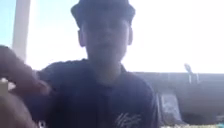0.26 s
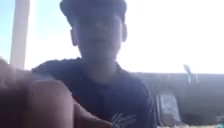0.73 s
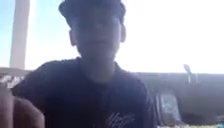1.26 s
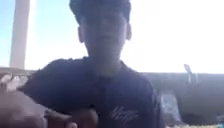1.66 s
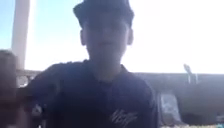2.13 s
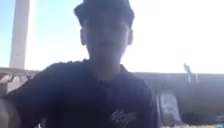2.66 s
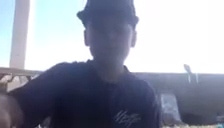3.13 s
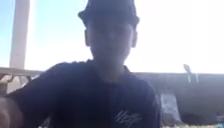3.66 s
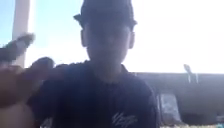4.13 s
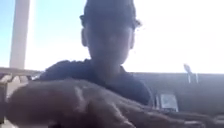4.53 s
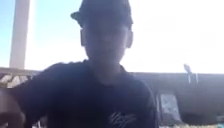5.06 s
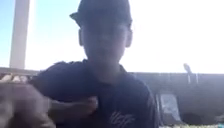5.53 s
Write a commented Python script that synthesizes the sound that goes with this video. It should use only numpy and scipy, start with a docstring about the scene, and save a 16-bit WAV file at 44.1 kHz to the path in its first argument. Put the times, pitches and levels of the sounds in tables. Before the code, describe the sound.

A toy fingerboard clatters onto a hollow plastic cooler lid right at the start, close by, with a faint low outdoor rumble behind. A sharp pop comes at about 0.5 seconds, followed by a short whirring roll over the pebbled plastic. From 1.3 seconds the board skids and clacks hard, and at 1.5 a hand jolts the cooler with one deep, short thud. Gritty scrapes, rolling and more clatter follow until about 2.5 seconds. Then it is quieter, with fingers shuffling the board and tapping it down lightly. Around 3.9 to 4.1 seconds loud clacks and skids drum the lid. The wheels roll with a hollow rumble from 4.2 to about 4.9 seconds, with one clack along the way. A last cluster of hard hits and scrapes comes at 5.3 to 5.5 seconds, ending in a brief roll and a soft tap near 5.8.

```python
"""A toy fingerboard is ridden on the hollow plastic lid of a cooler, outdoors and close by.
Its tail pops on the lid and its wheels clatter down: each hit rings the board and drums the lid.
Rolling and skidding over the pebbled plastic make tiny bumps that whirr, hiss and rumble.
Fingers shuffle the board back and tap it down, and the hand jolts the cooler once.
A faint low rumble lies behind."""
import sys
import numpy as np
from scipy import signal
from scipy.fft import rfft, irfft, next_fast_len
from scipy.io import wavfile
from scipy.ndimage import map_coordinates

SR = 44100
rng = np.random.default_rng(int(sys.argv[2]) if len(sys.argv) > 2 else 0)


def digitize_waveform(pressure):
    """Quantize a signal to 16-bit integers and store it at the path in sys.argv[1].

    Rows of a 2-D input are taken as channels; values are limited to [-1, 1].
    """
    field = np.atleast_2d(pressure).T
    bounded = np.clip(field, -1, 1)
    quanta = np.round(bounded * 32767).astype(np.int16)
    wavfile.write(sys.argv[1], SR, quanta)


N = 255735


def amp(db):
    """Turn decibels into a number to multiply by."""
    return 10 ** (np.asarray(db) / 20)


def unit(x):
    """Scale a sound to an average (rms) level of 1."""
    return x / np.sqrt(np.mean(x ** 2) + 1e-20)


def wobble(rate):
    """A smooth random curve through `rate` points a second."""
    return map_coordinates(rng.standard_normal(int(N * rate / SR) + 4), [np.arange(N) * rate / SR])


def coloured(x, tone):
    """Filter a sound to follow a tone curve of (pitch_hz, level_db) points."""
    size = 8192
    pitch_hz, level_db = np.transpose(tone)
    curve_db = np.interp(np.log(np.fft.rfftfreq(size, 1 / SR) + 1), np.log(pitch_hz), level_db)
    # build the filter so that it never sounds ahead of its input
    cepstrum = irfft(np.log(amp(curve_db)))
    cepstrum[1:size // 2] *= 2
    cepstrum[size // 2 + 1:] = 0
    response = irfft(np.exp(rfft(cepstrum))).reshape((1,) * (x.ndim - 1) + (-1,))
    return signal.fftconvolve(x, response, axes=-1)[..., :x.shape[-1]]


def lowpass(x, top_hz):
    """Cut away the sound above top_hz."""
    size = next_fast_len(N + SR // 2)
    hz = np.fft.rfftfreq(size, 1 / SR)
    return irfft(rfft(x, size) / np.sqrt(1 + (hz / top_hz) ** 120), size)[..., :N]


def brighter(x, level_db, edge_hz=7000, neutral_db=-32):
    """Hard contact gets more treble, soft contact less."""
    treble = signal.sosfiltfilt(signal.butter(2, edge_hz, "highpass", fs=SR, output="sos"), x)
    return x + (amp(0.3549 * (level_db - neutral_db)) - 1) * treble


def wander(x, depth_db, width_hz, life_s):
    """Random pitch bands swell and sink, as they do when the board moves from spot to spot."""
    hz, t, bands = signal.stft(x, SR, nperseg=512)
    grid = np.array(np.meshgrid(hz / width_hz, t / life_s, indexing="ij"))
    drift = map_coordinates(rng.standard_normal((512, 256)), grid, order=1, mode="wrap")
    drift *= np.clip(hz / 1500, .7, 1.4)[:, None]  # high pitches change most
    return signal.istft(bands * amp(depth_db * drift), SR, nperseg=512)[1][:N]


def fade(t, fade_s):
    """Die away by 60 dB in fade_s seconds."""
    return np.exp(-np.log(1000) * t / fade_s)


def struck(rows):
    """Scale each hit so that its first 6 ms have an average level of 1."""
    head = int(.006 * SR)
    return rows / np.sqrt(np.mean(rows[:, :head] ** 2, axis=1, keepdims=True))


def ring(tones, t, boost_db, scatter_db, detune):
    """A struck part rings with fading tones, a little different each time; one row per hit."""
    out = 0
    for k, (hz, db, fade_s) in enumerate(tones):
        level_db = db + boost_db(hz)
        level_luck, pitch_luck = rng.standard_normal((len(level_db), 2)).T[:, :, None]
        wave = np.sin(2 * np.pi * hz * (1 + detune * pitch_luck) * t)
        out = out + (-1) ** k * amp(level_db + scatter_db * level_luck) * fade(t, fade_s) * wave
    return struck(out)


def burst(tone, t, count, crack_s, tail_db, tail_s):
    """A noisy crack, then the rattle of small parts; one row per hit."""
    shape = fade(t, crack_s) + amp(tail_db) * fade(t, tail_s)
    return struck(coloured(rng.standard_normal((count, len(t))) * shape, tone))


# Tone of the outdoor background: pitch_hz, level_db
OUTDOOR_TONE = [(25, -38), (52, -8), (78, -1), (140, -12.5), (330, -19.5), (700, -31.5), (2000, -53.5),
                (10000, -69.5)]
def outdoors():
    """A low, slightly restless rumble."""
    return amp(-44.0 + 0.23 * wobble(1.4)) * unit(coloured(rng.standard_normal(N), OUTDOOR_TONE))


def cooler_jolt(start_s=1.502, pitch_hz=55.0):
    """The hand jolts the cooler, which rocks with a deep, short thud."""
    t = np.maximum(np.arange(N) / SR - start_s, 0)
    return amp(-19) * fade(t, 0.3) * (1 - fade(t, .04)) * np.sin(2 * np.pi * pitch_hz * t)


# The wheels speed up and run out (grit and rumble are counted from level_db):
# fastest_s, speed_up_s, run_out_s, level_db, grit_db, rumble_db
RIDES = [(0.06, 0.033, 0.19, -26, -7.5, -20), (0.56, 0.065, 0.21, -20, -9, -11),
         (0.677, 0.094, 0.14, -15.5, -8.5, -1), (1.99, 0.2, 0.29, -26.5, -12.5, -14.5),
         (2.229, .14, 0.17, -27.5, -11.5, -1), (4.21, 0.15, 0.18, -30.5, -9.5, -3),
         (4.502, .12, 0.19, -24.5, -9.5, 1.5), (4.698, 0.17, 0.26, -21, -8.5, 1),
         (5.488, 0.11, .15, -27.5, -12.5, 0.5)]
# The board skids or is shuffled sideways (grit is counted from level_db):
# strongest_s, length_s, level_db, grit_db
SKIDS = [(0.4, 0.49, -56.5, -1.5), (0.459, 0.027, -29, -1), (0.897, 0.14, -36.5, -8.5),
         (1.094, 0.18, -46, -10), (1.299, 0.11, -20.5, -5), (1.505, 0.14, -21.5, -4),
         (1.677, 0.14, -51, 3.5), (1.745, 0.088, -21, -7), (1.824, 0.067, -29.5, -5),
         (1.885, 0.055, -22, -6), (2.307, 0.09, -28.5, -3.5), (2.427, 0.079, -30.5, -9),
         (2.558, 0.18, -32, -14.5), (2.753, 0.11, -30, -20.5), (3.163, 0.072, -40, -15),
         (3.288, 0.27, -48, -16), (3.871, 0.038, -31, -18), (3.939, 0.1, -23, -8.5),
         (4.104, 0.11, -18.5, -8), (5.292, 0.11, -23.5, -6), (5.422, 0.098, -18.5, -3),
         (5.627, 0.05, -39.5, -3.5), (5.762, 0.17, -35, -17.5)]
def board_travel():
    """How loud wheels, grit and lid rumble are: each ride or skid swells with speed and dies away."""
    t = np.arange(N) / SR
    ride_curves, skid_curves = (2.8, 1.79), (1.29, 1.29)  # rise, fall; smaller makes a sharper peak
    skid_rise_share, skid_rumble_db, drop_db = .42, -2.5, 22
    moves = [(*ride, *ride_curves) for ride in RIDES]
    for peak_s, length_s, db, grit_db in SKIDS:
        rise_s, fall_s = skid_rise_share * length_s, (1 - skid_rise_share) * length_s
        moves.append((peak_s, rise_s, fall_s, db, grit_db, skid_rumble_db, *skid_curves))
    # the hand never holds the board quite still
    energy = np.zeros((3, N)) + amp([[-65.5], [-75], [-65.5]]) ** 2
    for peak_s, rise_s, fall_s, db, grit_db, rumble_db, rise_curve, fall_curve in moves:
        near = slice(*np.searchsorted(t, [peak_s - 3 * rise_s, peak_s + 3 * fall_s]))
        since = t[near] - peak_s
        slowing = np.where(since < 0, abs(since / rise_s) ** rise_curve, abs(since / fall_s) ** fall_curve)
        peak_db = np.array([[db], [db + grit_db], [db + rumble_db]])
        energy[:, near] += amp(peak_db - drop_db * slowing) ** 2
    return np.sqrt(energy)


def pebble_bumps(per_second, spread_db, rub_db):
    """Tiny random bumps on the pebbled plastic, over a smooth rub."""
    hit = rng.random(N) < per_second / SR
    size = amp(spread_db * np.clip(rng.standard_normal(N), -2, 2)) * rng.choice([-1, 1], N)
    return unit(hit * size) + amp(rub_db) * rng.standard_normal(N)


# Ringing tones of the lid's panels, also used for hits: pitch_hz, level_db, fade_s
PANEL_RING = [(270, -9.5, 0.27), (334, -0.5, 0.077), (430, -4, 0.04), (567, 1.5, 0.022), (753, -4, 0.12),
              (939, 7, 0.036), (1065, 2.5, 0.046), (1245, -1.5, 0.046), (1475, 5, 0.044),
              (1626, -9.5, 0.044), (1660, -9.5, 0.048)]
# Tone of the whirring wheels: pitch_hz, level_db
WHEEL_TONE = [(250, -30.5), (550, -4.5), (800, -2), (960, 4), (1120, -3), (1300, -3), (1550, -8),
              (1850, -16), (3000, -56.5)]
# Tone of the gritty hiss, also used for hits: pitch_hz, level_db
GRIT_TONE = [(1100, -26.5), (1900, 6), (2800, 9), (4400, -0.5), (6000, 0), (7600, 0), (8400, -4.5),
             (9500, -8.5)]
# Tone of the hollow lid's rumble: pitch_hz, level_db
HOLLOW_TONE = [(70, -41), (125, -2.5), (185, 8.5), (235, 1.5), (288, 10.5), (345, 5.5), (450, 5.5),
               (660, 6.5), (980, -24.5)]
def rolling_wheels():
    """The same bumps sound in the wheels, ring the panels, hiss as grit and rumble in the lid."""
    wheel_gain, grit_gain, rumble_gain = board_travel()
    bumps = pebble_bumps(per_second=1300, spread_db=3.0, rub_db=-1.0)
    bumps *= amp(1.97 * wobble(120))  # uneven wheels chatter
    bumps = wander(bumps, depth_db=4.2, width_hz=110, life_s=.13)
    t = np.arange(SR // 5) / SR
    treble_boost_db = lambda hz: np.array([[3 * np.log2(hz / 1000)]])
    one_ring = ring(PANEL_RING, t, treble_boost_db, scatter_db=9.0, detune=0.0022)[0]
    panels = unit(signal.fftconvolve(bumps, one_ring)[:N])
    wheels = unit(unit(coloured(bumps, WHEEL_TONE)) + amp(-13.5) * panels)
    grit = brighter(unit(coloured(bumps, GRIT_TONE)), 20 * np.log10(grit_gain))
    rumble = unit(coloured(bumps, HOLLOW_TONE))
    return amp(-2.5) * (wheel_gain * wheels + rumble_gain * rumble) + amp(-2.73) * grit_gain * grit


# The board hits the lid: start_s, clack_db, snap_db, drum_db
BOARD_HITS = [(0.006, -19.5, -28, -33), (0.031, -22, -30, -54), (0.050, -14.5, -19.5, -26.5),
              (0.084, -23.5, -27, -38), (0.112, -16, -22, -37), (0.125, -15.5, -24, -51),
              (0.166, -24, -41, -56), (0.218, -34, -56, -75), (0.4673, -10, -19, -39),
              (0.66, -14.5, -37, -42), (0.689, -19, -37, -45), (1.291, -18.5, -20, -20.5),
              (1.3931, -14.5, -23.5, -30), (1.4103, -7.5, -19, -28), (1.461, -19, -26, -37),
              (1.4977, -12, -17.5, -20), (2.046, -21, -55, -44), (2.102, -18, -30, -36),
              (2.121, -15.5, -21, -28), (2.154, -15.5, -20.5, -29), (2.196, -40, -25, -39),
              (2.289, -20, -34, -35.5), (2.382, -28.5, -37.5, -46), (3.086, -27, -46, -38),
              (3.937, -13, -19, -16.5), (4.074, -9, -20, -16), (4.087, -8, -19.5, -20.5),
              (4.112, -15, -47, -45), (4.653, -12.5, -34, -32), (4.976, -25.5, -26.5, -27),
              (5.284, -22.5, -22, -17), (5.39, -7, -23.5, -16.5), (5.402, -7.5, -28, -34),
              (5.493, -21, -39, -52), (5.765, -29, -50, -51)]
# Fingertips set the board down lightly: start_s, clack_db
LIGHT_TAPS = [(0.897, -33), (0.996, -44), (1.015, -47.5), (1.074, -40.5), (1.121, -36.5), (1.248, -33),
              (2.223, -26.5), (2.827, -42), (2.896, -48), (2.971, -48), (3.063, -44.5), (3.371, -47),
              (3.5, -51.5), (3.751, -53.5), (5.036, -32.5), (5.179, -34.5), (5.264, -28.5)]
def axle_hits_and_taps():
    """List both axles of every hit, then the taps, in the same columns as BOARD_HITS."""
    start_s, clack_db, snap_db, drum_db = np.transpose(BOARD_HITS)
    loss_db = -1 + 1.18 * clack_db  # a harder hit leaves more for the second axle
    lag_s = .008 * np.exp(.2 * rng.standard_normal(len(start_s)))  # the board's tilt varies
    # the lid drums mostly when the second axle brings the weight down
    first = np.column_stack([start_s, clack_db, snap_db, drum_db - 9.5])
    second = np.column_stack([start_s + lag_s, clack_db + loss_db, snap_db + loss_db, drum_db])
    taps = [(tap_s, db, db - 10.5, db - 4.5) for tap_s, db in LIGHT_TAPS]
    return np.vstack([first, second, taps])


# Where the board lands decides which pitch rings most: time_s, pitch_hz
LANDING_SPOTS = [(0.47, 574), (1.28, 1450), (1.52, 1545), (2.1, 1076), (2.3, 270), (3.94, 860), (4.07, 370),
                 (4.65, 405), (5.39, 1070), (5.45, 430)]
# Tone of the noisy knock in each clack: pitch_hz, level_db
KNOCK_TONE = [(60, -13.5), (300, -0.5), (600, -7.5), (1000, 1), (1500, -7.5), (1900, -16.5), (2600, -23.5)]
# Thin ring of the board and its metal axle mounts: pitch_hz, level_db, fade_s
BOARD_RING = [(2790, -7.5, 0.032), (4720, -3.5, 0.04), (6110, -5.5, 0.013), (7250, -10.5, .04)]
# Low tones of the whole lid flexing: pitch_hz, level_db, fade_s
LID_DRUM = [(147.3, -8.5, 0.041), (178.5, 2.5, 0.072), (245.8, -6, 0.039)]
def board_clatter():
    """Each hit scuffs in, snaps and rings the board, clacks in the panels and drums the whole lid."""
    starts_s, clack_db, snap_db, drum_db = axle_hits_and_taps().T[:, :, None]
    t, count = np.arange(SR // 5) / SR, len(starts_s)
    spot_hz = np.interp(starts_s, *np.transpose(LANDING_SPOTS))
    spot_boost_db = lambda hz: 11.0 * np.exp(-(np.log2(hz / spot_hz) / .35) ** 2)
    panels = ring(PANEL_RING, t, spot_boost_db, scatter_db=4.5, detune=0.0085)
    knock = burst(KNOCK_TONE, t, count, crack_s=0.035, tail_db=-14, tail_s=0.13)
    clack = amp(clack_db - 0.5) * struck(panels + amp(-1.0) * knock)
    snap = amp(snap_db + 1.5) * burst(GRIT_TONE, t, count, crack_s=0.028, tail_db=-10, tail_s=0.06)
    snap += amp(snap_db - 14.5) * ring(BOARD_RING, t, spot_boost_db, scatter_db=6, detune=0.027)
    snap = brighter(snap, snap_db)
    drum = amp(drum_db + 1.5) * ring(LID_DRUM, t, spot_boost_db, scatter_db=6.0, detune=0.0069)
    # the edge scrapes over the pebbled plastic just before it bites
    swell = fade(t[::-1], 0.018)
    scuff = amp(snap_db - 10.0) * swell * unit(coloured(rng.standard_normal(snap.shape), GRIT_TONE))
    scuff += amp(clack_db - 7.0) * swell * unit(coloured(rng.standard_normal(snap.shape), KNOCK_TONE))
    out = np.zeros(N + SR)
    for start_s, hit in zip(starts_s[:, 0], np.hstack([scuff, clack + snap + drum])):
        out[round(start_s * SR):][:len(hit)] += hit
    clatter = out[len(t):][:N]  # shift so that each scuff ends at its hit's start time
    return wander(clatter, depth_db=2.2, width_hz=400, life_s=.05)


def scene():
    """Add all the sounds into one channel."""
    return (board_clatter() + rolling_wheels() + cooler_jolt() + outdoors())[None]


def record(dry):
    """The whole sound loses its top treble; the loudest clacks are squashed, clip and spit a little."""
    squashed = dry / (1 + np.abs(dry / 1.12) ** 6) ** (1 / 6)
    clipped = np.clip(lowpass(squashed, top_hz=10030), -1.0, 1.0)
    return lowpass(clipped, top_hz=16000)


dry = scene()
out = record(dry)
digitize_waveform(out)
```